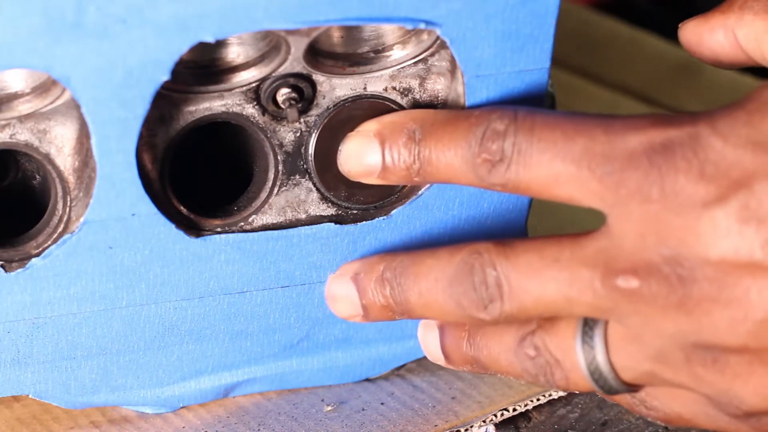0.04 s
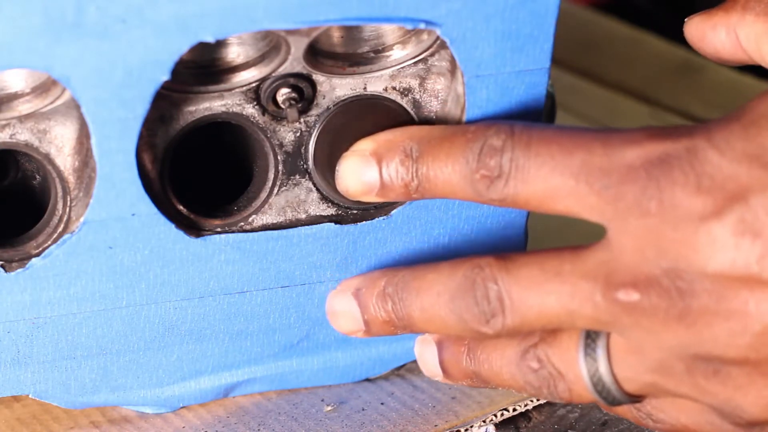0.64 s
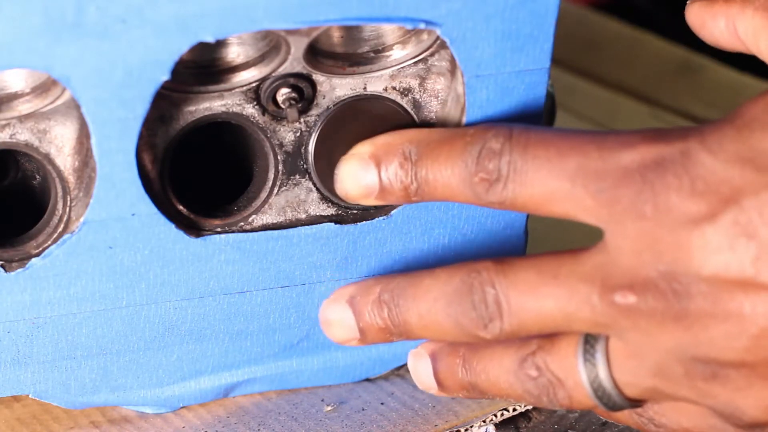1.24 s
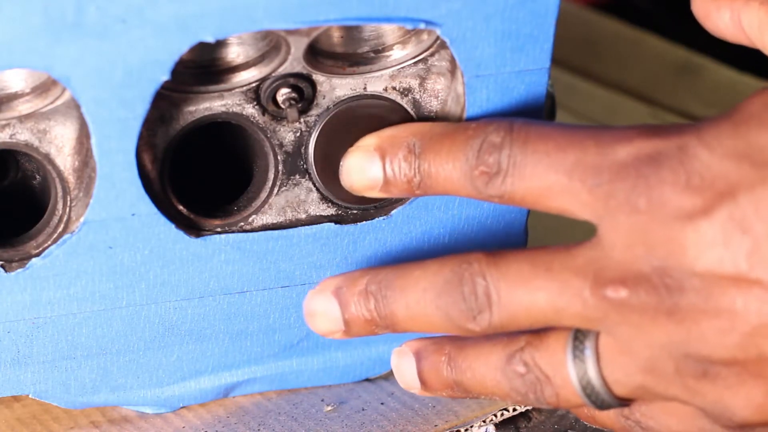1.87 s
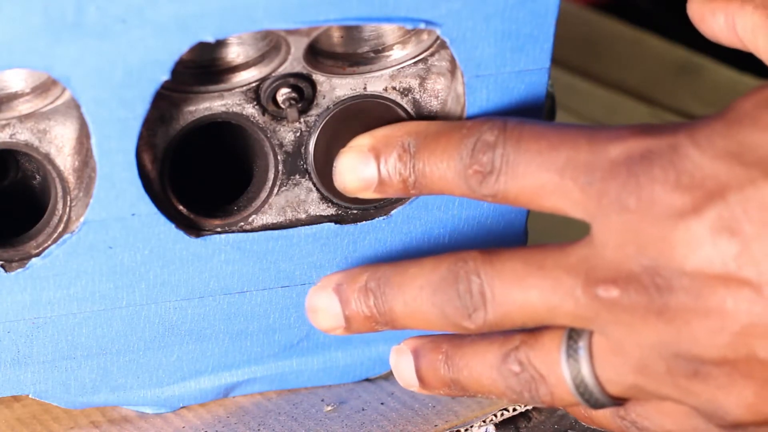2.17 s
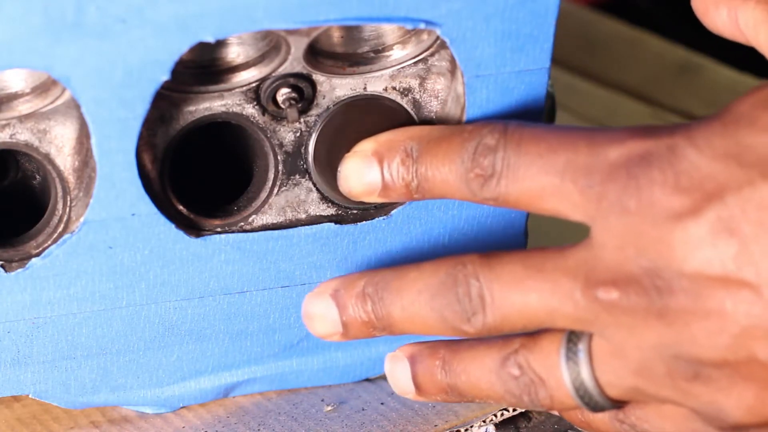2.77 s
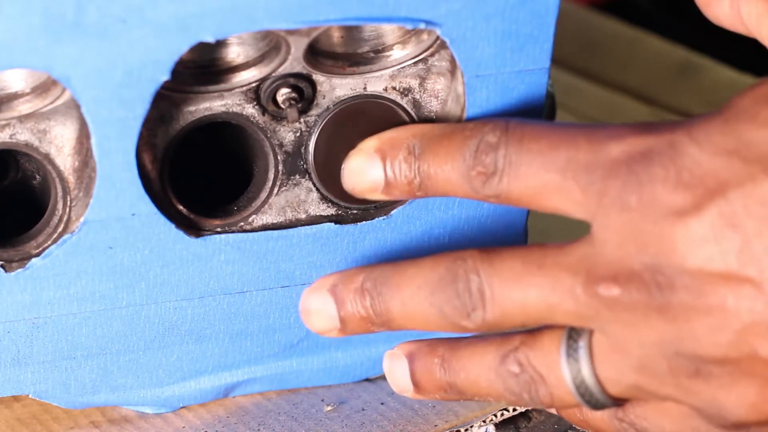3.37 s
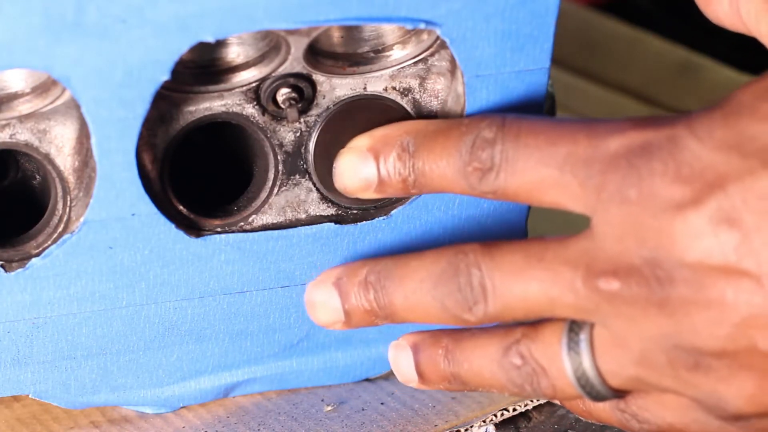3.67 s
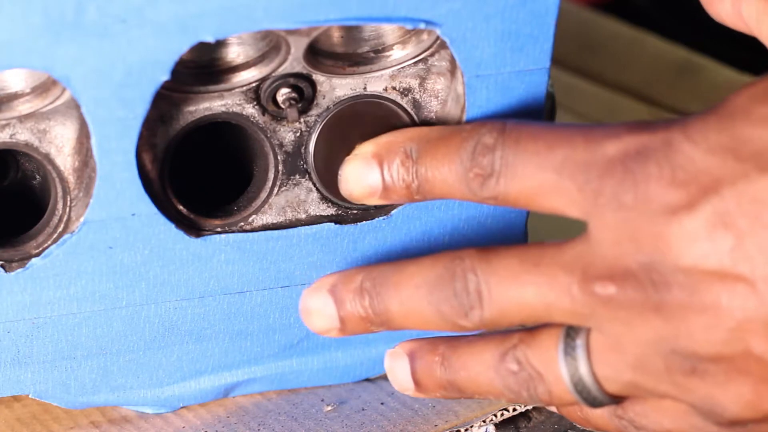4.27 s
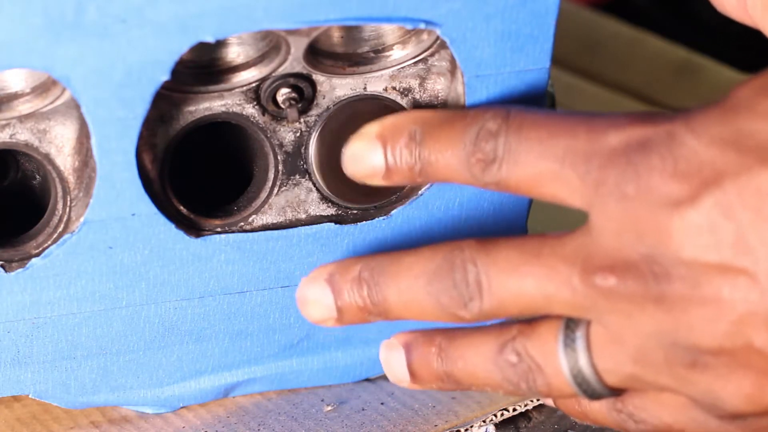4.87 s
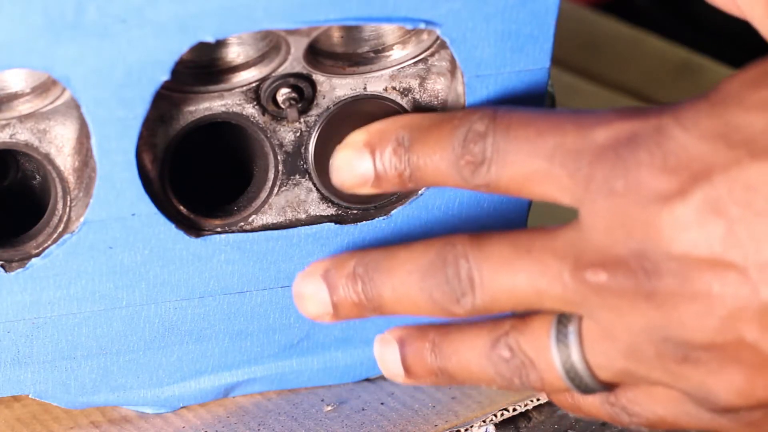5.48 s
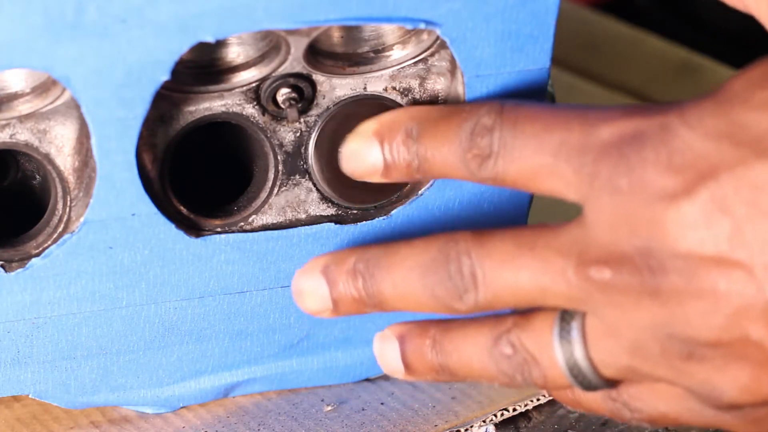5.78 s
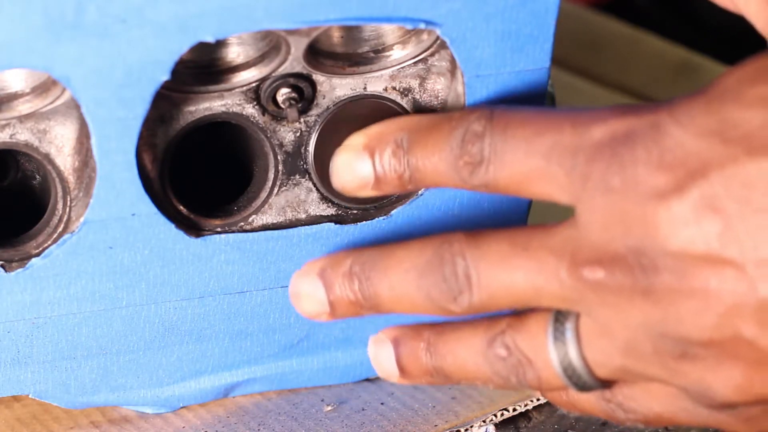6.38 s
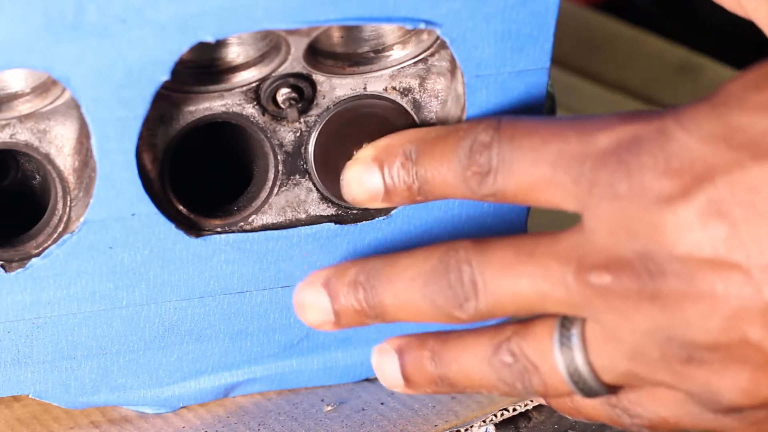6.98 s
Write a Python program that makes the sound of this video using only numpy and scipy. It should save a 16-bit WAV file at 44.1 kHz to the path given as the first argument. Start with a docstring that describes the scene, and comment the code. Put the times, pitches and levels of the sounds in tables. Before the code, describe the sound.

A trigger clicks softly and an electric drill runs up to a hissing whine, spinning an engine valve against its seat in abrasive paste. Gritty grinding rings through the metal cylinder head, swelling about twice a second under a pressing finger, with small chattering snags. A thin squeal sounds briefly near the start. The motor revs once, then settles to a steady pitch. It is heard close up in a garage.

```python
"""Valve lapping with a drill.

Close by in a garage, an electric drill spins an engine valve on its seat, abrasive paste between them.
The paste grinds and chatters into the cylinder head, swelling about twice a second under a finger.
The motor runs up, revs once and settles, whining on every fifth shaft order over brush and fan hiss."""
import sys
import numpy as np
from scipy import signal
from scipy.fft import rfft, irfft
from scipy.io import wavfile
from scipy.ndimage import uniform_filter1d, map_coordinates

SR = 44100
rng = np.random.default_rng(int(sys.argv[2]) if len(sys.argv) > 2 else 0)


def transcribe(signal):
    """Save signal, clipped to [-1, 1], as a 16-bit WAV file at the path in sys.argv[1]."""
    frames = np.atleast_2d(signal).T
    limited = np.clip(frames, -1, 1)
    pcm = np.round(limited * 32767).astype(np.int16)
    wavfile.write(sys.argv[1], SR, pcm)


N = 313992
TIME_S = np.arange(N) / SR
BINS_HZ = np.maximum(np.arange(4097) * SR / 8192, 1)
CRUISE_HZ = 245


def undb(db):
    """Decibels to gain."""
    return 10 ** (np.asarray(db) / 20)


def unit(x):
    """Scale to rms 1."""
    return x / np.sqrt(np.mean(x ** 2))


def curves(table):
    """Each column of a timed table, per sample."""
    times_s, *columns = np.transpose(table)
    return [np.interp(TIME_S, times_s, column) for column in columns]


def colour(points):
    """Gain per bin from (frequency [Hz], level [dB]) points."""
    hz, db = np.transpose(points)
    return undb(np.interp(np.log(BINS_HZ), np.log(hz), db))


def bell(hz, centre_hz, width_hz):
    """Resonance curve, 1 at its centre."""
    return 1 / (1 + (2 * (hz - centre_hz) / width_hz) ** 2)


def swell(middle_s, length_s, power=2):
    """Smooth bump, length_s wide at half height; a higher power flattens the top."""
    return np.exp2(-(2 * (TIME_S - middle_s) / length_s) ** power)


def shape(x, gain):
    """Minimum-phase filter from a gain per bin: rings after a blow, never before."""
    cepstrum = irfft(np.log(gain + 1e-9))
    half = len(cepstrum) // 2
    folded = np.r_[cepstrum[0], 2 * cepstrum[1:half], np.zeros(half)]
    return signal.fftconvolve(x, irfft(np.exp(rfft(folded))))[:len(x)]


def walk(rate_hz):
    """Ramps between random levels, rms 1."""
    hold = max(int(SR / rate_hz), 2)
    steps = np.repeat(rng.standard_normal(N)[:N // hold + 1], hold)
    return unit(uniform_filter1d(steps, hold)[:N])


def grains(rate_hz, spread_db):
    """Clicks of random time and size, rms 1."""
    size = undb(spread_db * np.minimum(rng.exponential(size=N), 6))
    return unit((rng.random(N) < rate_hz / SR) * size * rng.standard_normal(N))


def reflections(t60_s, delay_s):
    """Dense decaying echoes, energy 1."""
    t = TIME_S[:SR // 2]
    tail = rng.standard_normal(len(t)) * np.exp(-np.log(1000) * t / t60_s) * (t > delay_s)
    return tail / np.sqrt(np.sum(tail ** 2))


def steady(lines):
    """Sines from (frequency [Hz], rms level [dB]) rows."""
    return sum(np.sqrt(2) * undb(db) * np.sin(2 * np.pi * hz * TIME_S) for hz, db in lines)


# mains hum: (frequency [Hz], level [dB])
MAINS_HUM = [(60, -78.5), (120, -74.5)]
# room noise spectrum: (frequency [Hz], relative level [dB])
ROOM_SPECTRUM = [(25, -32), (40, -13), (60, -2.5), (120, 8.5), (250, 4), (500, 6.5), (1000, 0),
                 (2000, -4.5), (6500, -12), (10000, -13), (15000, -14)]


def room_tone(noise_db=-59):
    """The garage at rest: mains hum over low noise."""
    noise = unit(shape(rng.standard_normal(N), colour(ROOM_SPECTRUM)))
    return steady(MAINS_HUM) + noise * undb(noise_db)


# speed control tones: (frequency [Hz], level [dB])
WHISTLE_TONES = [(6430, -70), (7750, -70)]


def whistle(spun_up):
    """The speed control whistles thinly until the motor spins up."""
    return (1 - spun_up) * steady(WHISTLE_TONES)


# trigger click spectrum: (frequency [Hz], relative level [dB])
CLICK_SPECTRUM = [(60, 6), (150, 14), (400, -7), (1200, 9), (3000, 2), (8000, 2), (15000, -22)]


def trigger(start_s=0.033, decay_s=0.0076, gain_db=-47):
    """The plastic switch closes with a small dull click."""
    envelope = (TIME_S >= start_s) * np.exp(-np.abs(TIME_S - start_s) / decay_s)
    return undb(gain_db) * shape(envelope * rng.standard_normal(N), colour(CLICK_SPECTRUM))


# speed set by the trigger: (time [s], shaft rate [Hz])
SHAFT_SPEED = [(0.13, 49.3), (0.204, 99.7), (0.298, 132.6), (0.439, 161.2), (0.53, 171.0), (0.617, 179.6),
               (0.762, 199.3), (0.858, 209.3), (0.956, 215.9), (1.09, 220.7), (1.218, 222.7), (1.49, 232.8),
               (1.81, 238.4), (1.92, 274.6), (2.02, 295.3), (2.147, 315.2), (2.3, 293.2), (2.43, 279.4),
               (2.62, 270.3), (2.83, 256.9), (3.1, 252.0), (3.33, 247.2), (3.65, 245.7), (4.4, 245.9),
               (4.6, 247.1), (5.05, 246.8), (5.35, 245.7), (6.2, 245.0), (6.85, 244.8), (7.12, 243.3)]


def motor_speed(sag_hz=2.3, lag_s=0.14, sag_s=0.22, sag_onset_s=(4.3, 4.7)):
    """Shaft rate in Hz; late on, each finger press drags it down a moment later."""
    free_hz, = curves(SHAFT_SPEED)
    drag_hz = sag_hz * sum(swell(s + lag_s, sag_s) for s, _, _ in FINGER_PRESSES)
    return free_hz - drag_hz * np.interp(TIME_S, sag_onset_s, [0, 1])


def hiss_level(shaft_hz, brush_db=-37.5, fan_db=-37, fan_db_per_decade=71, press_db=1, lag_s=0.097):
    """Hiss in dB: brushes constant, fan rising with speed, a small lift after each press."""
    fan = undb(fan_db + fan_db_per_decade * np.log10(shaft_hz / CRUISE_HZ))
    load_db = press_db * sum(swell(s + lag_s, length_s=0.16) for s, _, _ in FINGER_PRESSES)
    return 20 * np.log10(np.hypot(undb(brush_db), fan)) + load_db


# brush and fan spectrum: (frequency [Hz], relative level [dB])
HISS_SPECTRUM = [(60, -53), (170, -12), (290, -14.5), (400, -12.5), (800, -1), (2000, -1.5), (3600, 5.5),
                 (4600, 1), (5700, 3), (7300, 1.5), (8400, -3.5), (9500, -4.5), (12000, -10),
                 (14000, -12.5), (15500, -18)]


def brushes_and_fan(shaft_hz, angle, hiss_db, pulse_depth=0.076, ring_gain=0.49, trim_db=-0.3):
    """Fine sparking and fan air, pulsing five times a turn and ringing faintly off nearby surfaces."""
    pulsing = 1 + pulse_depth * np.cos(5 * angle)
    hiss = grains(rate_hz=38000, spread_db=-0.5) * pulsing * undb(0.53 * walk(rate_hz=34))
    ringing = signal.fftconvolve(hiss, reflections(t60_s=0.053, delay_s=0.00042))[:N]
    hiss = unit(shape(hiss + ring_gain * ringing, colour(HISS_SPECTRUM)))
    # faster brushes hiss brighter
    treble = signal.sosfiltfilt(signal.butter(2, 10000, "high", fs=SR, output="sos"), hiss)
    treble_db = 11 * (np.maximum(shaft_hz / CRUISE_HZ, 0.8) - 1.16)
    return (hiss + treble * (undb(treble_db) - 1)) * undb(hiss_db + trim_db)


# knocks at the seat: (time [s], relative level [dB])
VALVE_KNOCKS = [(0.142, -50), (0.164, -48), (0.195, -33.5)]


def knocks(decay_s=0.0093, gain_db=18):
    """Force of light scuffing blows as the valve takes up its play."""
    envelope = np.zeros(N)
    for s, db in VALVE_KNOCKS:
        envelope += undb(db + gain_db) * (TIME_S >= s) * np.exp(-np.abs(TIME_S - s) / decay_s)
    return envelope * rng.standard_normal(N)


# head and port resonances: (frequency [Hz], width [Hz], gain [dB], left minus right [dB])
HEAD_MODES = [(152, 60, -28, 0), (485, 101, -21.5, -3), (600, 170, -14.8, -2), (755, 66, -3.5, 4),
              (793, 39, -5, 6), (884, 110, -12, -1), (965, 37, -6, 5), (1016, 40, -6, 3),
              (1100, 60, -6, -3), (1184, 71, .5, -1), (1238, 57, 0, -6), (1407, 86, -7, -2),
              (1559, 160, -6.5, -1), (1726, 20, -2.5, -1), (1815, 16, -.5, -1), (1869, 22, 2.3, 1),
              (1941, 181, -11, -2), (2090, 146, -9, 1), (2483, 258, -18, 2), (2927, 25, -16, 13),
              (3316, 155, -12.5, -3), (3495, 127, -10.5, 0), (3651, 383, -14, -2), (3789, 41, -8, 4),
              (4247, 55, -10, 4), (4862, 335, -21, 5), (5631, 314, -14, -1), (6263, 148, -14, 0),
              (7449, 101, -17, 1), (7987, 186, -16, 1)]
# grit scratch between the resonances: (frequency [Hz], gain [dB])
GRIT_SPECTRUM = [(30, -59), (90, -84), (250, -61), (320, -27), (370, -36), (450, -23.5), (1000, -17.5),
                 (2700, -63), (4500, -53), (7500, -24.5), (10000, -28.5), (15000, -43.5)]


def cylinder_head(force):
    """The casting rings to a force at the seat; most resonances radiate more to one side."""
    channels = []
    for side in (1, -1):
        power = sum((undb(db + side * pan_db / 2) * bell(BINS_HZ, hz, width_hz)) ** 2
                    for hz, width_hz, db, pan_db in HEAD_MODES)
        channels.append(shape(force, np.sqrt(power + colour(GRIT_SPECTRUM) ** 2)))
    return np.array(channels)


# rotor tones, one per multiple of the pole rate: (base level [dB], waver [dB], phase sway [rad])
ROTOR_TONES = [(-48.5, 2.2, .4), (-47.4, .6, .068), (-47, 2.2, .55), (-47.3, 2, .25), (-46.3, 1.8, .2),
               (-58, .6, .11), (-55.2, 1.8, .15), (-61, 2.4, .15), (-64.3, 2.4, .15), (-58, 1.8, .15),
               (-64, 2.5, .25), (-63.5, 2.5, .3), (-62.5, 2.5, .3)]
# casing peaks and notches per tone: (order [x shaft rate], centre [Hz], width [Hz], gain [dB])
CASING_MODES = [(5, 791, 200, -16.0), (5, 1222, 45, 10.0), (5, 1327, 25, -9.0), (5, 1409, 150, 15.0),
                (5, 1525, 70, -11.0), (10, 1500, 500, -14.9), (10, 1826, 148, 16.0), (10, 2046, 49, 11.5),
                (10, 2178, 14, -16.0), (10, 2236, 89, 3.6), (10, 2317, 18, -13.5), (10, 2380, 30, -2.0),
                (10, 2420, 10, -3.0), (10, 2446, 45, 7.2), (10, 2483, 7, -10.0), (10, 2490, 355, 10.6),
                (10, 3130, 160, 3.0), (15, 2469, 100, 14.0), (15, 2822, 266, -9.0), (15, 3100, 120, 4.0),
                (15, 3368, 70, 11.0), (15, 3727, 224, 8.1), (15, 3809, 50, -11.0), (15, 4343, 295, -6.3),
                (15, 4714, 69, 3.0), (20, 2470, 150, 13.0), (20, 3050, 300, 4.0), (20, 3730, 150, 12.0),
                (20, 4123, 32, -16.0), (20, 4452, 129, -16.0), (20, 4890, 50, 5.0), (20, 5104, 181, -16.0),
                (20, 5293, 174, 7.0), (20, 5732, 190, 11.0), (20, 6094, 250, -10.0), (25, 3500, 900, 4.5),
                (25, 4438, 302, -10.8), (25, 5730, 322, 10.7), (25, 6006, 346, -13.5),
                (25, 7437, 79, -10.8), (30, 3600, 500, 12.0), (30, 5373, 1200, 13.0), (30, 6762, 154, 16.0),
                (30, 7081, 101, 13.0), (30, 7297, 33, -16.0), (30, 7360, 74, 15.5), (30, 7469, 57, 12.7),
                (30, 7708, 171, 15.8), (30, 8698, 216, 11.0), (30, 9430, 100, 10.3), (35, 5780, 220, 12.0),
                (35, 6799, 1400, 7.0), (35, 7810, 150, 4.0), (35, 7991, 635, 7.9), (35, 8234, 81, -16.0),
                (35, 8634, 39, -14.0), (35, 8928, 196, -10.8), (35, 9127, 1400, 8.5),
                (35, 10200, 374, -9.1), (40, 7228, 794, 12.5), (40, 9423, 169, 9.4), (40, 9738, 109, 9.5),
                (40, 10213, 125, 7.8), (45, 9614, 800, 15.0), (45, 10344, 165, 11.7), (45, 11080, 50, 4.0),
                (45, 11403, 395, 14.0), (45, 11615, 270, -16.0), (50, 11296, 147, -16.0),
                (50, 12109, 66, -8.0), (50, 12301, 60, 8.5), (50, 12370, 70, 5.0), (50, 13133, 567, 8.1),
                (50, 14064, 1532, -16.0), (55, 13432, 190, -16.0), (55, 13506, 61, 14.0),
                (60, 12951, 465, 8.9), (60, 15298, 109, -16.0)]
# unbalance hum at top speed: (order [x shaft rate], level [dB])
UNBALANCE_TONES = [(.5, -61), (1, -55.5)]


def rotor_whine(shaft_hz, angle, poles=5, effort_db_per_decade=22):
    """Tones locked to the shaft flare and fade as they glide through the casing's resonances."""
    def tone(order, db, waver_db, sway_rad):
        amplitude = np.sqrt(2) * undb(db + waver_db * walk(rate_hz=28))
        phase = order * angle + sway_rad * walk(rate_hz=41) + 2 * np.pi * rng.random()
        return amplitude * np.cos(phase)

    effort_db = effort_db_per_decade * np.log10(np.maximum(shaft_hz / CRUISE_HZ, 0.7))
    whine = np.zeros(N)
    for harmonic, (db, waver_db, sway_rad) in enumerate(ROTOR_TONES, start=1):
        order = poles * harmonic
        casing_db = sum(peak_db * bell(order * shaft_hz, hz, width_hz)
                        for mode_order, hz, width_hz, peak_db in CASING_MODES if mode_order == order)
        whine += tone(order, db + casing_db + effort_db, waver_db, sway_rad)
    # unbalance grows steeply with speed, the half-rate shudder most
    shake_db = 90 * np.log10(shaft_hz / shaft_hz.max())
    for order, db in UNBALANCE_TONES:
        whine += tone(order, db + shake_db / order, waver_db=1.5, sway_rad=0.2)
    return whine


# brush buzz spectrum: (frequency [Hz], relative level [dB])
BUZZ_SPECTRUM = [(200, -22), (1000, -14), (3500, -3), (6000, 0), (8000, -.5), (10000, -4), (13000, -7.5),
                 (15500, -12)]


def commutator_buzz(angle, hiss_db, relative_db=-10.5):
    """The brushes ride the same uneven commutator every turn, buzzing on the shaft's harmonics."""
    bumps = irfft(np.exp(2j * np.pi * rng.random(size=72)), n=1024)
    position = angle / (2 * np.pi) * len(bumps)
    buzz = map_coordinates(bumps, [position], order=3, mode="grid-wrap")
    return unit(shape(buzz, colour(BUZZ_SPECTRUM))) * undb(hiss_db + relative_db)


# growl, fading as the paste wears fine, back with coarse grit: (time [s], gain [dB])
GROWL_GAIN = [(.25, 5), (.7, 5.5), (1.4, 4), (2.2, 4.5), (2.7, 3), (3.3, 3), (3.8, 2.3), (4.0, -1),
              (4.5, 2), (4.92, 0), (5.02, 8), (5.25, 6.5), (5.85, 4.5), (6.5, 3.5), (7.1, 3)]
# finger on the valve: (middle [s], length [s], rasp rise [dB])
FINGER_PRESSES = [(0.67, 0.4, 9), (1.208, 0.41, 10), (1.764, 0.44, 10.5), (2.254, .42, 10),
                  (2.73, 0.35, 10.5), (3.21, 0.35, 9), (3.747, 0.34, 9), (4.223, 0.28, 9.5),
                  (4.723, 0.32, 8.5), (5.208, 0.36, 10.5), (5.603, 0.34, 8.5), (6.069, 0.33, 9.5),
                  (6.515, 0.4, 8), (6.927, .33, 9)]


def grinding(turning, shaft_hz, angle, gain_db=-20, catch_db=7, growl_hz=(380, 1300), growl_share=0.4):
    """Force of grains crushed between valve and seat; the rasp follows the finger more than the growl."""
    # at low speed the valve catches and slips about once in three motor turns
    slowness = np.clip(1 - shaft_hz / shaft_hz.max(), 0, 1)
    catching = undb(catch_db * slowness * np.cos(angle / 3 + walk(rate_hz=20)))
    catching_rms = np.sqrt(uniform_filter1d(catching ** 2, size=2400))
    bunches = unit(undb(-0.06 * walk(rate_hz=75))) * catching / catching_rms
    crushing = grains(rate_hz=7000, spread_db=0.34) * bunches
    force = crushing * turning * undb(gain_db + 0.64 * walk(rate_hz=18))
    growl = signal.sosfiltfilt(signal.butter(4, growl_hz, "band", fs=SR, output="sos"), force)
    rasp = force - growl
    growl_db, = curves(GROWL_GAIN)
    press_db = sum(db * swell(s, length_s, power=4) for s, length_s, db in FINGER_PRESSES)
    return rasp * undb(press_db) + growl * undb(growl_db + growl_share * press_db)


# snags near the head's resonances: (time [s], frequency [Hz], relative level [dB])
VALVE_SNAGS = [(0.274, 1204, -27), (.41, 768, -21.5), (.462, 790, -19), (.477, 768, -15), (.503, 1222, -23),
               (0.535, 1220, -26), (0.579, 1216, -36), (0.654, 1188, -19.5), (.671, 1200, -19),
               (.698, 1220, -29), (.728, 1193, -19.5), (.811, 779, -19.5), (1.069, 764, -19.5),
               (1.175, 1230, -23), (1.227, 1185, -20), (1.274, 1203, -17), (1.336, 1198, -21),
               (1.694, 775, -28), (1.719, 1188, -23), (2.08, 762, -21), (2.143, 771, -22),
               (2.162, 1196, -21), (2.28, 1210, -19), (2.296, 1214, -15), (2.303, 1863, -17),
               (2.843, 765, -18.5), (3.337, 766, -21.5), (4.149, 1244, -28), (4.262, 1228, -20),
               (5.075, 772, -20), (5.078, 1213, -26), (5.1, 1230, -26), (5.161, 1230, -25),
               (5.184, 1200, -23), (5.225, 1240, -26), (5.314, 1232, -24), (5.364, 1210, -22),
               (5.406, 1200, -20), (5.535, 1210, -20.5), (5.578, 1208, -25), (5.627, 1220, -23),
               (5.652, 1200, -18), (5.682, 760, -17.5), (5.891, 753, -19), (5.979, 771, -16.5),
               (6.557, 1223, -24)]


def snags(length_s=0.007, lead_s=0.003985, gain_db=-1.5, scuff_db=2):
    """Force of the valve snagging on coarse grains: a short stick-slip shudder with a scuff of grit."""
    t = TIME_S[:SR // 20]
    middle_s = t[-1] / 2
    grip = swell(middle_s, length_s)[:len(t)]
    force = np.zeros(N)
    for s, hz, db in VALVE_SNAGS:
        shudder = np.sin(2 * np.pi * (hz * t + rng.random()))
        scuff = undb(scuff_db) * rng.standard_normal(len(t))
        start = int((s - lead_s - middle_s) * SR)  # early: the head takes a moment to ring up
        force[start:start + len(t)] += undb(db + gain_db) * grip * (shudder + scuff)
    return force


# valve squeal: (time [s], frequency [Hz], level [dB])
SQUEAL_PATH = [(.63, 5000, -80), (.67, 5020, -41), (.74, 5040, -43), (.79, 5005, -45), (.83, 5040, -43),
               (.9, 5000, -45), (.96, 4820, -73)]


def squeal(waver_db=3.6):
    """Friction at the seat holds one mode of the valve ringing for a moment."""
    hz, db = curves(SQUEAL_PATH)
    sounding = (TIME_S > SQUEAL_PATH[0][0]) & (TIME_S < SQUEAL_PATH[-1][0])
    amplitude = np.sqrt(2) * sounding * undb(db + waver_db * walk(rate_hz=31))
    return amplitude * np.sin(2 * np.pi * np.cumsum(hz) / SR)


# sideways reflections: (frequency [Hz], relative gain [dB])
WALL_SPECTRUM = [(60, -0.5), (250, -6), (750, -5.5), (1200, -8), (1700, -13), (2500, -4.5), (4500, -9),
                 (8000, -4), (13000, 1)]
# diffuse tail against the direct sound: (frequency [Hz], gain [dB])
TAIL_SPECTRUM = [(100, -15), (1000, -27), (2500, -11), (8000, -11), (13000, -6)]


def garage(direct, walls_db=-3):
    """Bench and walls spread the sound sideways and leave a short tail."""
    mid = direct.mean(axis=0)
    echoes = signal.fftconvolve(mid, reflections(t60_s=0.36, delay_s=0.0025))[:N]
    side = undb(walls_db) * shape(echoes, colour(WALL_SPECTRUM))
    diffuse = shape(mid, colour(TAIL_SPECTRUM))
    tails = [signal.fftconvolve(diffuse, reflections(t60_s=0.16, delay_s=0.0054))[:N] for _ in range(2)]
    return direct + np.array([side, -side]) + np.array(tails)


def scene():
    """The trigger clicks, the motor starts, then the valve turns and grinds."""
    shaft_hz = motor_speed()
    hiss_db = hiss_level(shaft_hz)
    grit_drag = 1 + 0.000565 * walk(rate_hz=30)
    angle = 2 * np.pi * np.cumsum(shaft_hz * grit_drag) / SR
    running = np.interp(TIME_S, [0.1, 0.22], [0, 1]) ** 2
    spun_up = np.interp(TIME_S, [0.17, 0.26], [0, 1])
    turning = np.interp(TIME_S, [0.185, 0.24], [0, 1])
    rotor = spun_up * (rotor_whine(shaft_hz, angle) + commutator_buzz(angle, hiss_db))
    hiss = running * brushes_and_fan(shaft_hz, angle, hiss_db)
    drill = whistle(spun_up) + trigger() + hiss + rotor
    valve = squeal() + cylinder_head(grinding(turning, shaft_hz, angle) + knocks() + snags())
    return garage(drill + valve + room_tone())


def record(dry, cutoff_hz=15550):
    """Steep low-pass on the top treble."""
    return signal.sosfiltfilt(signal.ellip(10, 0.05, 60, cutoff_hz, fs=SR, output="sos"), dry)


dry = scene()
out = record(dry)
transcribe(out)
```